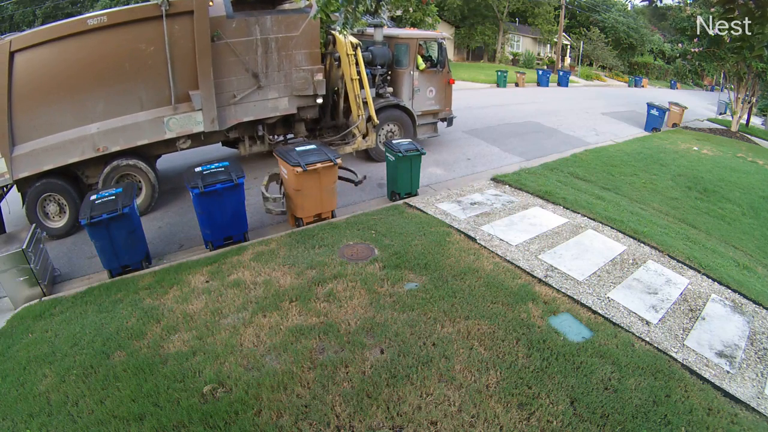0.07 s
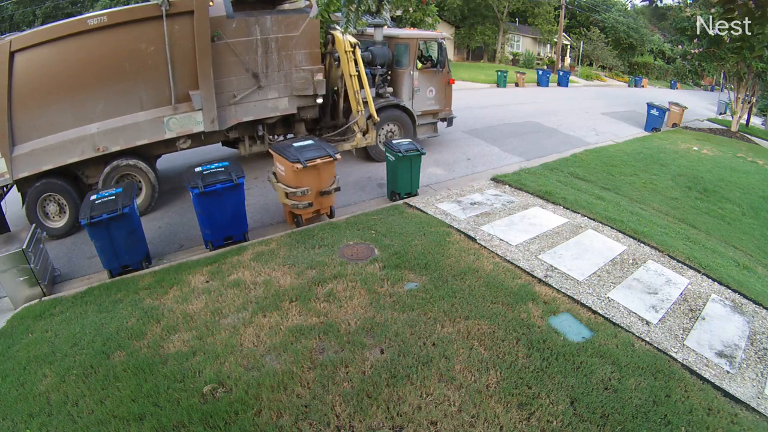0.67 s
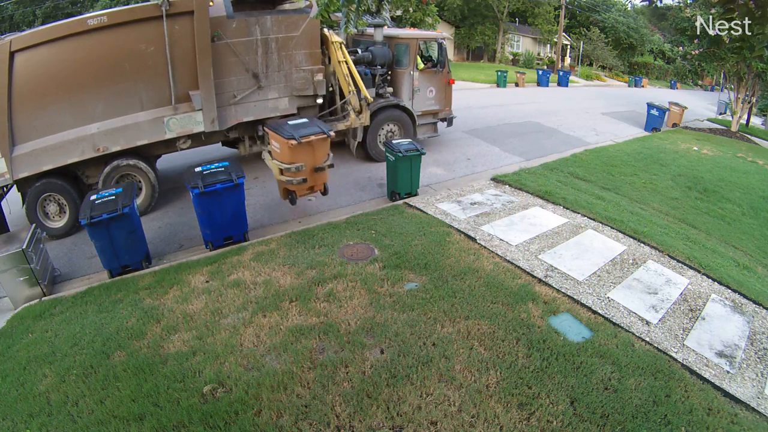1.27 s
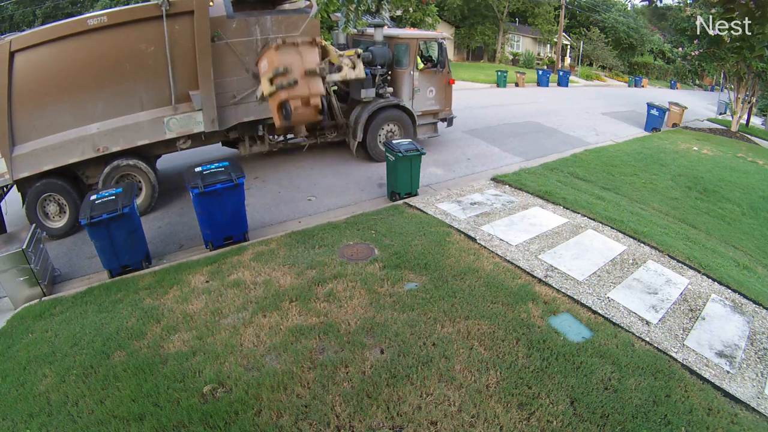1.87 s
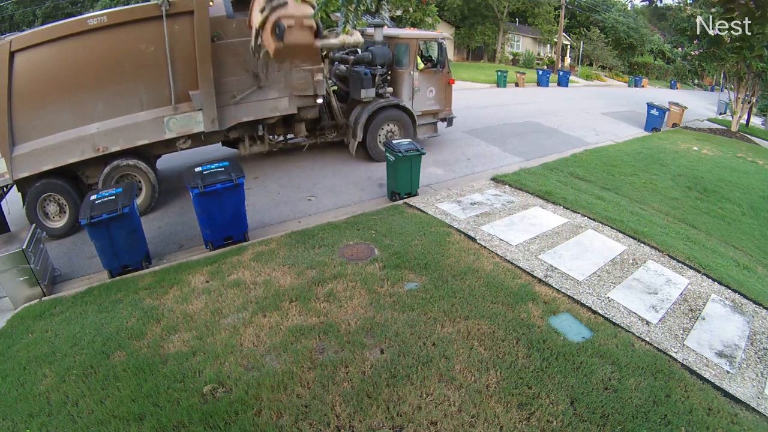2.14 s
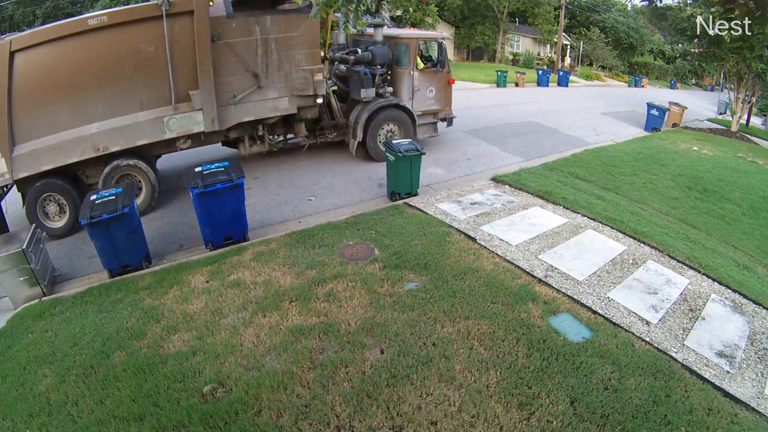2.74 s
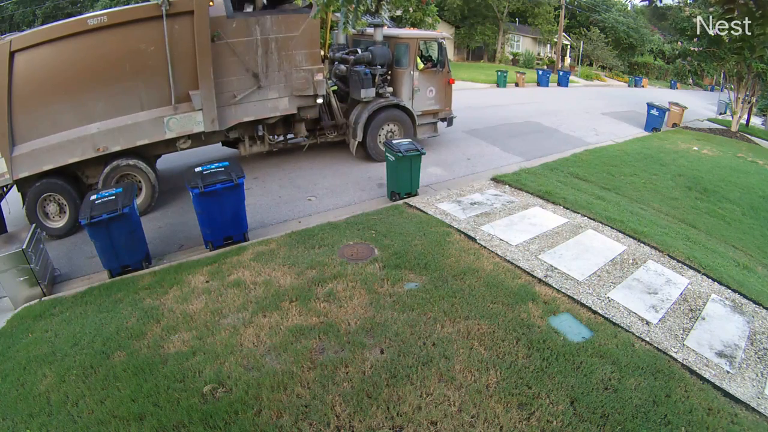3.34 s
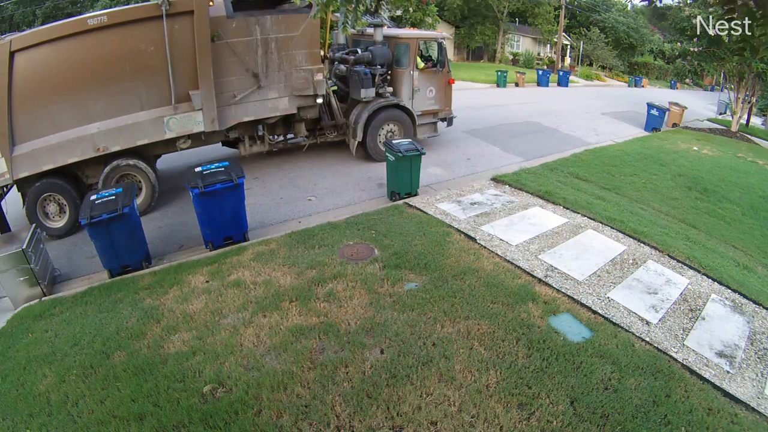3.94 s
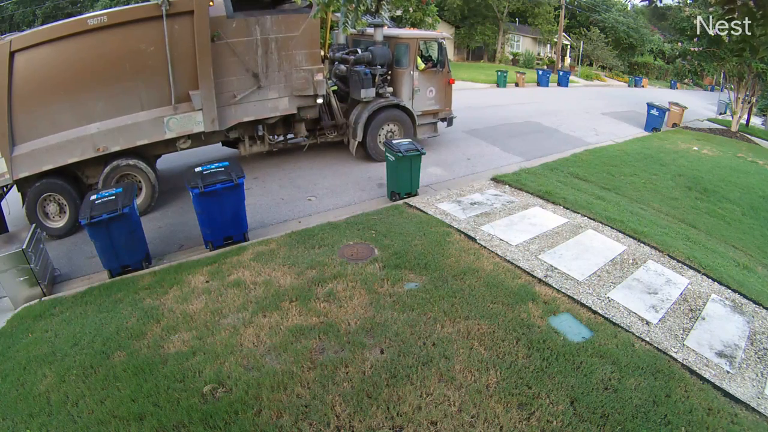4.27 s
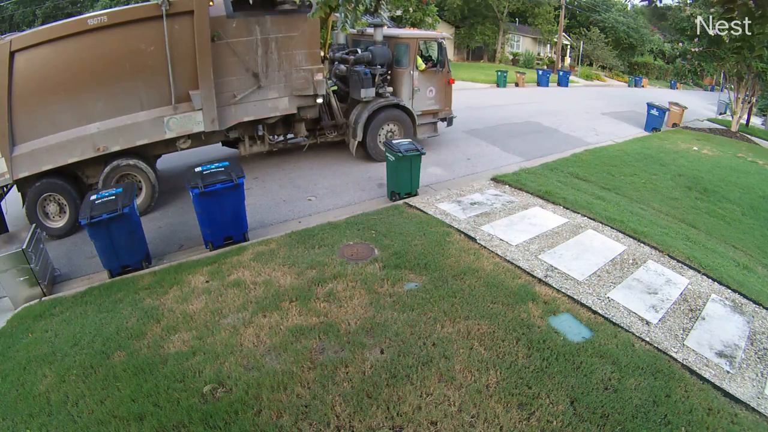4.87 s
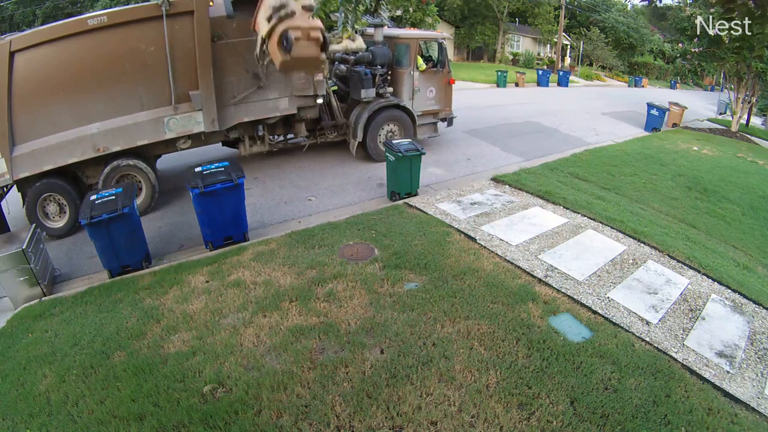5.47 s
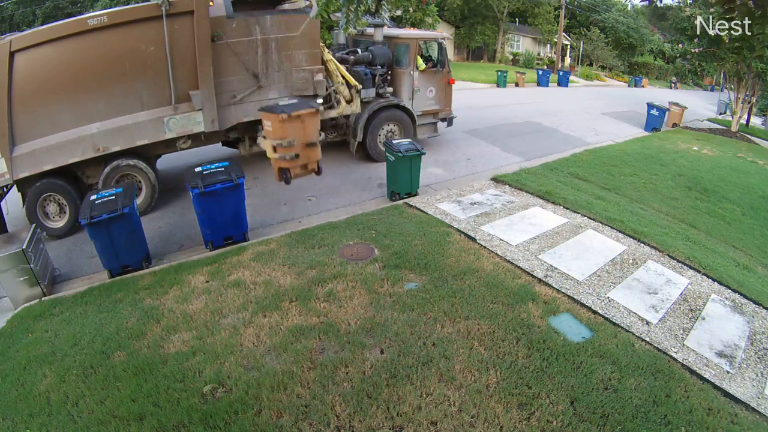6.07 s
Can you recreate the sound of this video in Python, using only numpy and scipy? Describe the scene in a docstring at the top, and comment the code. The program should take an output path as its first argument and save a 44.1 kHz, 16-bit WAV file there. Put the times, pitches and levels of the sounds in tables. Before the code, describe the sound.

A garbage truck's diesel engine idles with a steady clatter and a light hydraulic hiss. Its steel arm grabs a plastic cart with a loud, hollow clank and a scrape. After another knock, rubbish tumbles and slides into the hopper. The engine revs slightly, then a dull thud, a brief squeak and a lighter clank follow. A small outdoor microphone hears it from across a lawn, with little bass.

```python
"""At the curb of a street, a garbage truck is heard across a lawn by a small outdoor camera.
Its side arm grabs a plastic cart, lifts it, dumps it into the steel hopper and brings it down again.
Impacts excite the damped modes of walls and linkages, sliding rubbish makes dense contact noise,
and dry joints squeak and groan by stick-slip friction. Behind them oil hisses through the valves
and the diesel runs on, its clatter modulated at the firing rate."""
import sys
import numpy as np
from scipy import signal
from scipy.fft import rfft, irfft
from scipy.io import wavfile
from scipy.ndimage import uniform_filter1d

SR = 44100
rng = np.random.default_rng(int(sys.argv[2]) if len(sys.argv) > 2 else 0)


def master_out(mix):
    """Clip the mix to full scale and print it as 16-bit PCM to the path in sys.argv[1]."""
    frames = np.transpose(np.atleast_2d(mix))
    ceiling = np.clip(frames, -1, 1)
    pcm = np.round(ceiling * 32767).astype(np.int16)
    wavfile.write(sys.argv[1], SR, pcm)


N = 273861
TIME = np.arange(N) / SR


# impacts of arm, cart and rubbish: t/s, level/dB, treble gain/dB, bass gain/dB, attack/s
IMPACTS = [(0.262, -25.5, -3, -16, 0.0072), (0.334, -17.5, -14.5, -18, 0.0015),
           (0.348, -34.5, -2, -12, 0.0032), (0.368, -31, -4, -28, 0.0044), (0.411, -44, 6, -19, .003),
           (0.453, -34, -2, -25, .003), (0.508, -37.5, -4.5, -15, 0.0031), (0.722, -36, 9, -24, 0.014),
           (0.734, -33, -3, -19, 0.0027), (0.749, -33.5, -17, -21, 0.0014), (1.547, -25.5, -7, -29, 0.0074),
           (1.558, -25.5, -21, -32, 0.0023), (2.642, -27, -11, -37, 0.01), (2.656, -27, -6, -36, 0.0047),
           (2.694, -26, -12, -38, 0.0085), (2.714, -27, -11, -28, .004), (2.809, -32, -16, -29, 0.0027),
           (2.918, -32.5, -10, -36, 0.0023), (5.134, -23, -29, -26, 0.015), (5.889, -33.5, -3, -27.5, .006),
           (5.935, -35.5, -19, -18, 0.0027)]
# spectra of an impact's hollow thud, bright crack and low boom: f/Hz, relative level/dB
THUD_SPECTRUM = [(100, -50.5), (200, -19.5), (400, 2.5), (520, 10), (640, 14), (880, 22), (1100, -21.5),
                 (1500, 9), (4000, -72.5)]
CRACK_SPECTRUM = [(700, -47), (1500, 13.5), (2400, 4), (3300, -4.5), (5500, -14), (7400, -22.5)]
BOOM_SPECTRUM = [(45, -24.5), (75, -25), (115, -14.5), (160, -3), (230, -0.5), (350, -2.5), (700, -18)]
# modes of the cart and hopper walls, and of the steel arm: f/Hz, relative level/dB, t60/s
WALL_MODES = [(245.3, -17, 0.17), (350, -12.5, 0.067), (410, -8.5, 0.065), (530, -10, 0.034),
              (631.5, -1, 0.093), (708, 4, 0.042), (861, 2, 0.074), (965, -3.5, 0.03)]
ARM_MODES = [(1570, 2, 0.12), (2008, 2, 0.16), (2150, 5, 0.26), (2385, 4, 0.2), (2470, -3, 0.2),
             (2645, 3, 0.12), (2853, -2, 0.2), (3135, -4, 0.24), (3354, -3, 0.16), (3610, -8, 0.22),
             (3820, -5, 0.12), (4060, -7, 0.1), (4530, -8, 0.08), (5700, -11, 0.14)]

def impacts(walls_db=-7, thud_db=-12, crack_db=-1, steel_db=-17.5,
            thud_t60=0.066, crack_t60=0.067, boom_t60=0.3):
    """Impulse excitation: each blow gives decaying noise and sets the walls and the steel ringing."""
    out, t = np.zeros(N), np.arange(SR // 3) / SR
    decay_db = -60 * t
    for start, db, treble_db, bass_db, attack in IMPACTS:
        thud = noise(THUD_SPECTRUM, len(t)) * amp(thud_db + decay_db / thud_t60)
        crack = noise(CRACK_SPECTRUM, len(t)) * amp(crack_db + treble_db + decay_db / crack_t60)
        boom = noise(BOOM_SPECTRUM, len(t)) * amp(bass_db + decay_db / boom_t60)
        walls = amp(walls_db) * free_vibration(WALL_MODES, t, detune=0.026)
        steel = amp(steel_db + treble_db) * free_vibration(ARM_MODES, t, detune=0.0042)
        onset = 1 - np.exp(-t / attack)
        add(out, start, amp(db) * onset * (thud + crack + boom + walls + steel))
    return out


def grabber(start=0.18, attack=0.16, hold=0.031, release=0.079, db=-39.5):
    """Forced vibration: steel fingers judder against the cart as they close and keep the arm ringing."""
    modes = [(hz, 2.2 / t60, level_db) for hz, level_db, t60 in ARM_MODES]  # bandwidth = 2.2 / t60
    return amp(db) * swell(start, attack, hold, release) * resonate(rng.standard_normal(N), modes)


# the grabber closes, the cart lifts, rubbish slides out twice, the cart tips back and swings down:
# peak t/s, level/dB, rise/(dB/s), fall/(dB/s)
SLIDE_EVENTS = [(.34, -37, 49.5, 53), (1.543, -43, 87, 46), (2.683, -39, 217, 19), (3.381, -47.5, 18, 6),
                (5.129, -44, 56, 26.5), (5.89, -42, 196, 56)]
# spectrum of the scraping: f/Hz, relative level/dB
SCRAPE_SPECTRUM = [(110, -37.5), (200, -18.5), (400, 3), (750, 7.5), (1100, 4), (1600, -3), (2300, 0),
                   (3300, -7.5), (5500, -9.5), (7400, -18)]

def sliding(contacts_per_s=1500, spread_db=2.5, clump_db=-1.0, panel_decay_s=0.0028):
    """Shot noise: many small contacts of plastic and rubbish on steel merge into a scrape, in clumps."""
    sizes = amp(spread_db * np.minimum(rng.exponential(1, N), 4)) * rng.choice([-1, 1], N)
    contacts = sizes * (rng.random(N) < contacts_per_s / SR)
    t = np.arange(SR // 50) / SR
    panel = rng.standard_normal(len(t)) * np.exp(-t / panel_decay_s)
    smear = irfft(np.exp(1j * np.angle(rfft(panel))))  # the panel spreads each contact out in time
    scrape = coloured(signal.oaconvolve(contacts, smear)[:N], SCRAPE_SPECTRUM)
    slides = [amp(db - np.maximum(rise * (peak - TIME), fall * (TIME - peak)))
              for peak, db, rise, fall in SLIDE_EVENTS]
    envelope = np.linalg.norm(slides, axis=0)  # overlapping slides add in power
    return scrape * envelope * amp(clump_db * wander(hz=43.8))


# bags bump in the cart, then in the hopper: t/s, level/dB
BAG_LANDINGS = [(0.338, -32), (0.738, -36), (1.552, -40), (1.665, -35), (2.69, -32), (2.731, -36),
                (5.111, -44)]
# spectrum of a bump: f/Hz, relative level/dB
BAG_SPECTRUM = [(120, -28.5), (200, -7), (300, -1), (430, 14), (560, -4), (900, -3), (1500, -50)]

def bags(rise=0.011, t60=0.12):
    """Soft impact: a full bag lands with a slow attack and a short, dull body."""
    out, t = np.zeros(N), np.arange(SR // 2) / SR
    for start, db in BAG_LANDINGS:
        envelope = (1 - np.exp(-t / rise)) * amp(db - 60 * t / t60)
        add(out, start, noise(BAG_SPECTRUM, len(t)) * envelope)
    return out


# dry joints of the arm: t/s, duration/s, f/Hz, glide/(Hz/s), level/dB, relative pitch jitter
JOINT_SQUEAKS = [(2.69, 0.22, 5520, -1500, -53, .005), (4.682, 0.046, 670, -900, -39, .05),
                 (5.84, 0.06, 3550, 0, -43.5, .04)]

def squeaks():
    """Stick-slip friction: a dry joint gives a short, rough whistle or groan."""
    out = np.zeros(N)
    for start, duration, hz, glide, db, jitter in JOINT_SQUEAKS:
        t = np.arange(0, duration, 1 / SR)
        pitch = (hz + glide * t) * (1 + jitter * wander(hz=304)[:len(t)])
        add(out, start, amp(db) * np.hanning(len(t)) * np.sin(2 * np.pi * np.cumsum(pitch) / SR))
    return out


# clatter of each cylinder, in firing order: relative level/dB
CYLINDER_LEVELS = [3.5, -1, 0, 2.7, -0.5, -1]
# spectra of injector and valve clatter, block knock and engine roar: f/Hz, relative level/dB
CLATTER_SPECTRUM = [(300, -4), (700, 13), (1500, 2.5), (2100, 7), (2700, -10.5), (3400, -5), (5000, -3),
                    (7400, -11.5)]
KNOCK_SPECTRUM = [(100, -38.5), (250, -26), (450, -5.5), (720, -3.5), (1050, -5.5), (1400, -18),
                  (2200, -13.5), (5000, -35)]
ROAR_SPECTRUM = [(70, -64.5), (120, -21), (190, -14.5), (260, -6), (420, -1.5), (700, -2.5), (1040, 2),
                 (1250, -14.5), (1560, -3.5), (2100, -2.5), (2900, -21), (3400, -8.5), (4500, -18),
                 (7400, -22.5)]
# modes of the engine's covers and pipes: f/Hz, bandwidth/Hz, relative level/dB
COVER_MODES = [(1545, 50, -4), (1625, 50, -5), (2060, 60, -2), (2149, 30, -1), (2584, 55, -3),
               (3275, 40, -7), (3365, 70, -7.5), (3700, 40, -10), (3820, 35, -9), (4608, 50, -13),
               (4773, 55, -11), (5259, 60, -12), (5992, 90, -16), (6900, 140, -18)]

def diesel(clatter_db=-9, covers_db=-8, knock_db=-6, roar_db=-2, spread_db=1.8):
    """Periodic excitation: six cylinders clatter and ring the covers; the block knocks once a turn."""
    firings = np.cumsum(firing_rate()) / SR
    firing_phase = firings + 0.31
    crank_phase = (firings + 2.305) / (len(CYLINDER_LEVELS) / 2)  # three firings to a crank turn
    cylinder = amp(CYLINDER_LEVELS)[firing_phase.astype(int) % len(CYLINDER_LEVELS)]
    clatter = noise(CLATTER_SPECTRUM)
    clatter *= unit_rms(cylinder * bursts(firing_phase, rise=0.18, fall=0.53, spread_db=spread_db))
    cover_force = rng.standard_normal(N) * bursts(firing_phase, rise=0.092, fall=0.65, spread_db=0.5)
    covers = resonate(cover_force, COVER_MODES)
    knock = noise(KNOCK_SPECTRUM) * bursts(crank_phase, rise=0.083, fall=0.39, spread_db=spread_db)
    roar = noise(ROAR_SPECTRUM) * amp(roar_db + 1.2 * wander(hz=29.3))
    engine = amp(clatter_db) * clatter + amp(covers_db) * covers + amp(knock_db) * knock + roar
    return amp(load_db()) * engine


IDLE_FIRING_HZ = 37.13
# departures from idle: t/s, attack/s, hold/s, release/s, change in firing rate/Hz
RATE_CHANGES = [(1.6, .35, .88, 1.14, -1.4), (3.81, .48, .41, .24, 2.44)]

def firing_rate():
    """Frequency modulation: the idle sags under the weight of the cart and later revs up briefly."""
    return IDLE_FIRING_HZ + sum(change * swell(*timing) for *timing, change in RATE_CHANGES)


# the pump swings the cart up, then shakes it and brings it back:
# t/s, attack/s, hold/s, release/s, gain/dB
PUMP_STROKES = [(1.044, 0.37, 1.01, 0.27, 1.3), (2.99, 0.33, 2.9, 0.25, 1.62)]

def load_db(idle_db=-45.5, db_per_hz=-0.07):
    """Mechanical load: engine and oil get louder with each stroke, and slightly as the speed sags."""
    strokes_db = sum(db * swell(*timing) for *timing, db in PUMP_STROKES)
    return idle_db + db_per_hz * (firing_rate() - IDLE_FIRING_HZ) + strokes_db


# spectrum of oil in the valves: f/Hz, relative level/dB
OIL_SPECTRUM = [(500, -30.5), (1500, -7), (2100, 17.5), (2800, 7.5), (3400, 3.5), (4500, -2), (7400, -43)]

def hydraulics(hiss_db=-10, drone_hz=694, drone_db=-53):
    """Flow noise: oil hisses through the valves, and the pump adds an unsteady drone."""
    hiss = noise(OIL_SPECTRUM) * amp(load_db() + hiss_db)
    pitch = drone_hz + 26 * wander(hz=37.5)
    drone = np.sin(2 * np.pi * np.cumsum(pitch) / SR) * amp(drone_db + 2 * wander(hz=15))
    return hiss + drone


def street(x, t60=0.16, wet_db=-10, first_echo_s=0.012):
    """Reflection: the truck's side, the houses and the trees add scattered echoes."""
    t = np.arange(SR // 2) / SR
    echoes = rng.standard_normal(len(t)) * (rng.random(len(t)) < 0.05)
    echoes *= (t > first_echo_s) * amp(-60 * t / t60)
    return x + amp(wet_db) * signal.oaconvolve(x, echoes / np.linalg.norm(echoes))[:N]


# scale of the treble's random dips: f/Hz, in thin patches/dB, in wide patches/dB
FLICKER_DEPTHS = [(900, 0, 0), (1250, 20, 0), (1600, 16, 0), (2300, 22, 1), (2900, 40, 8), (3400, 32, 7),
                  (4000, 40, 14), (5000, 40, 28), (7400, 36, 24)]

def flicker(x):
    """Random amplitude modulation: the treble flickers in narrow patches, giving a fine metallic ring."""
    hz, _, spectra = signal.stft(x, SR, nperseg=4096, noverlap=3072)
    at_hz, thin_db, wide_db = np.transpose(FLICKER_DEPTHS)
    thin = np.interp(hz, at_hz, thin_db)[:, None] * np.minimum(patches(spectra.shape, size=(4, 5)), 0)
    wide = np.interp(hz, at_hz, wide_db)[:, None] * np.minimum(patches(spectra.shape, size=(9, 6)), 0)
    gain = amp(thin + wide)
    gain /= np.sqrt(uniform_filter1d(gain ** 2, size=41, axis=0))  # neighbours share a steady power
    return signal.istft(spectra * gain, SR, nperseg=4096, noverlap=3072)[1][:N]


def free_vibration(modes, t, detune):
    """Modal decay: damped sinusoids, tuned a little differently at each place of contact."""
    hz, db, t60 = np.transpose(modes)[:, :, None]
    hz = hz * (1 + detune * rng.standard_normal(hz.shape))
    return np.sum(amp(db - 60 * t / t60) * np.sin(2 * np.pi * (hz * t + rng.random(hz.shape))), axis=0)


def resonate(x, modes):
    """Resonance: x drives modes of (f/Hz, bandwidth/Hz, level/dB); the result has rms 1."""
    f = np.fft.rfftfreq(N, 1 / SR)
    response = sum(amp(db) / (1 + 2j * (f - hz) / width) for hz, width, db in modes)
    return unit_rms(irfft(rfft(x) * response, N))


def bursts(phase, rise, fall, spread_db):
    """Pulse train: one burst of random strength per cycle; phase, rise and fall are in cycles."""
    fraction = phase % 1
    strength = amp(spread_db * np.minimum(rng.standard_normal(400), 1))[phase.astype(int)]
    return unit_rms(strength * (1 - np.exp(-fraction / rise)) * np.exp(-fraction / fall))


def swell(start, attack, hold, release):
    """Trapezoidal envelope: rises from 0 to 1, holds and falls back; times in seconds."""
    return np.clip(np.minimum((TIME - start) / attack, 1 - (TIME - start - attack - hold) / release), 0, 1)


def coloured(x, spectrum):
    """Spectral shaping: filters x by a curve of (f/Hz, level/dB); the result has rms 1."""
    hz, db = np.transpose(spectrum)
    f = np.fft.rfftfreq(len(x), 1 / SR)
    gain_db = np.interp(np.log(f + 1), np.log(hz), db, left=-90)
    return unit_rms(irfft(rfft(x) * amp(gain_db), len(x)))


def noise(spectrum, size=N):
    return coloured(rng.standard_normal(size), spectrum)


def wander(hz):
    """Low-pass noise: a random fluctuation of rms 1, mostly slower than hz."""
    f = np.fft.rfftfreq(N, 1 / SR)
    return unit_rms(irfft(rfft(rng.standard_normal(N)) * np.exp(-(f / hz) ** 2), N))


def patches(shape, size):
    """Correlated noise: a random field of rms 1, alike over size = (bins, frames)."""
    field = rng.standard_normal(shape[::-1]).T
    for _ in range(2):
        field = uniform_filter1d(uniform_filter1d(field, size[0], axis=0), size[1], axis=1)
    return unit_rms(field)


def amp(db):
    return 10 ** (np.asarray(db) / 20)


def unit_rms(x):
    return x / np.sqrt(np.mean(x ** 2) + 1e-20)


def add(mix, start, sound):
    part = mix[max(round(start * SR), 0):][:len(sound)]
    part += sound[:len(part)]


def scene():
    """Superposition: the flickering sustained noises and the short sounds add in one channel."""
    sustained = flicker(diesel() + hydraulics() + street(sliding()))
    transients = street(impacts() + grabber() + bags() + squeaks())
    return (sustained + transients)[None]


def gate(x, below_hz=200, open_db=-85.0, knee_db=3, depth_db=-30):
    """Spectral gating: the camera's noise suppressor turns down the bass bins while they are faint."""
    hz, _, spectra = signal.stft(x, SR, nperseg=2048, noverlap=1536)
    level_db = 10 * np.log10(uniform_filter1d(abs(spectra) ** 2, size=7, axis=1).clip(1e-20))
    shut = np.clip((open_db - level_db) / knee_db, 0, 1) * (hz < below_hz)[:, None]
    return signal.istft(spectra * amp(depth_db * shut), SR, nperseg=2048, noverlap=1536)[1][:N]


# notches in the response of the camera's housing: f/Hz, width/Hz, gain/dB
HOUSING_NOTCHES = [(1235, 100, -9), (2970, 140, -6), (4440, 70, -3), (5000, 100, -8), (6400, 70, -4)]

def record(dry, low_hz=90, high_hz=7520):
    """Frequency response: housing notches, a small microphone's lack of bass, then gate and band limit."""
    f = np.fft.rfftfreq(N, 1 / SR)
    housing_db = sum(db * np.exp(-((f - hz) / width) ** 2) for hz, width, db in HOUSING_NOTCHES)
    housed = irfft(rfft(dry[0]) * amp(housing_db), N)
    highpass = signal.butter(4, low_hz, btype="high", fs=SR, output="sos")
    lowpass = signal.firwin(1401, high_hz, window=("kaiser", 9), fs=SR)
    gated = gate(signal.sosfilt(highpass, housed))
    return signal.oaconvolve(gated, lowpass, "same")[None]


dry = scene()
out = record(dry)
master_out(out)
```